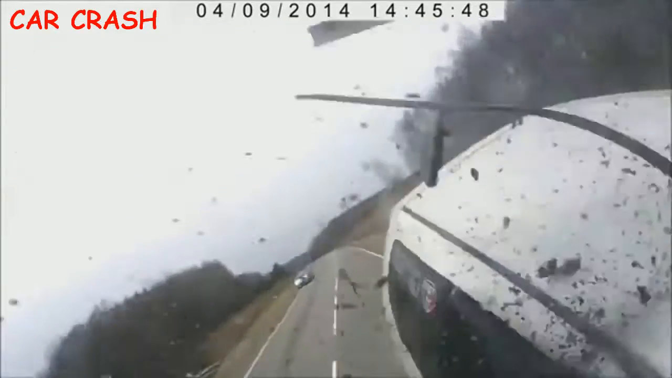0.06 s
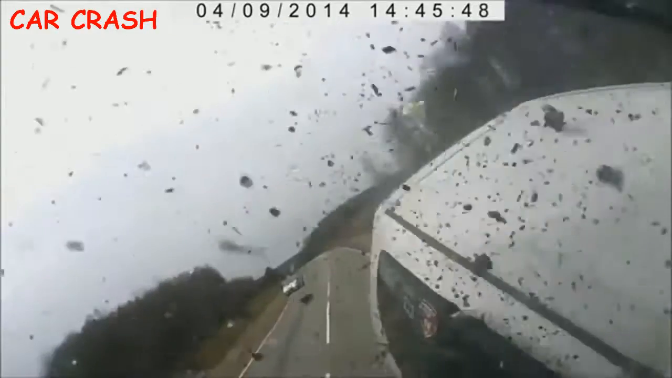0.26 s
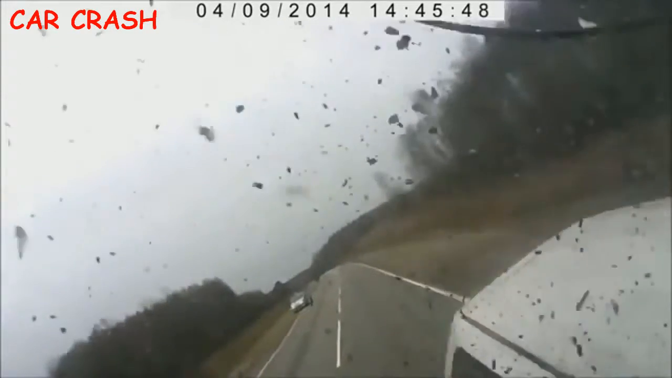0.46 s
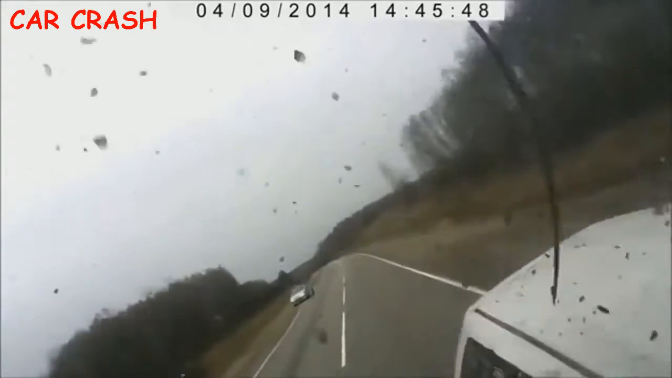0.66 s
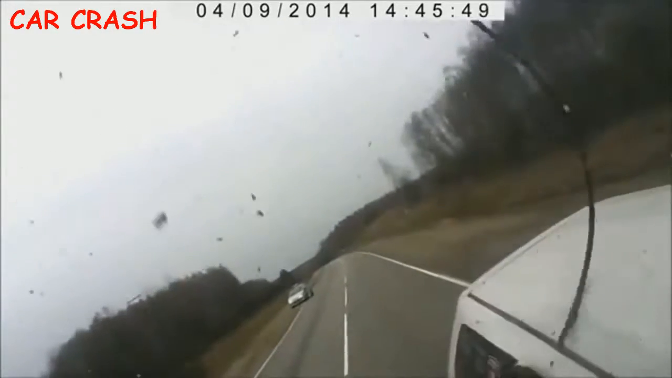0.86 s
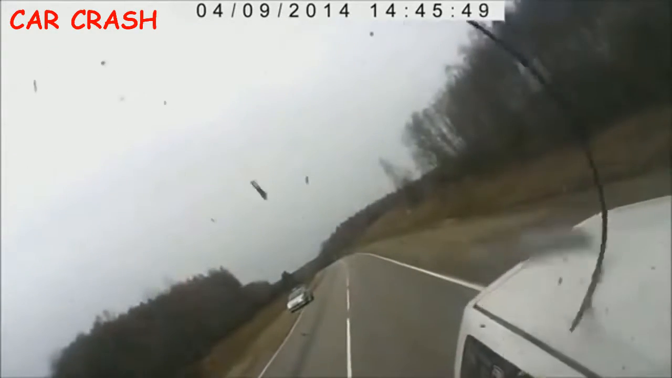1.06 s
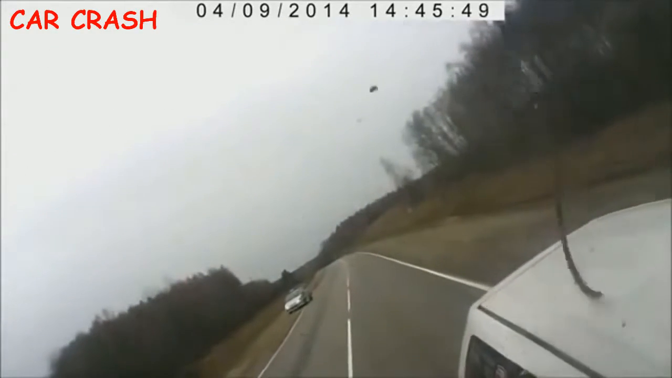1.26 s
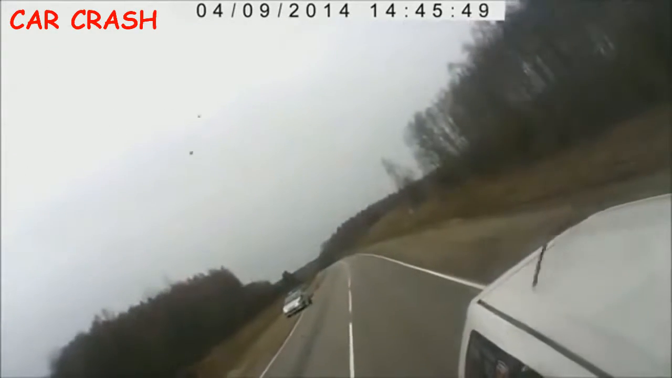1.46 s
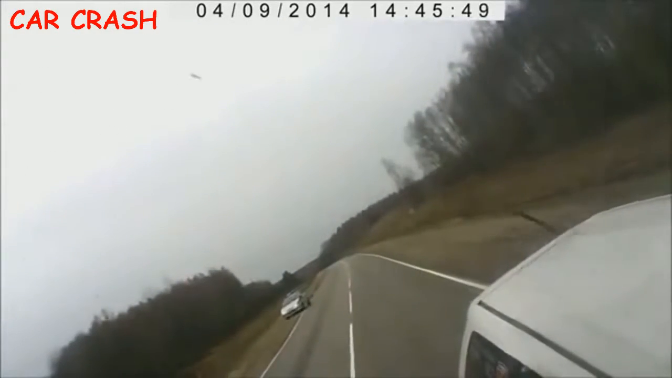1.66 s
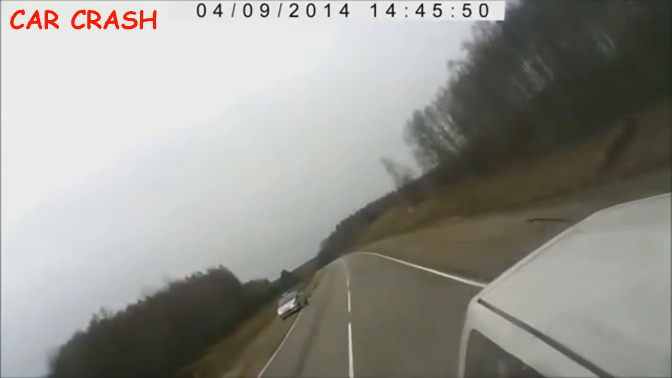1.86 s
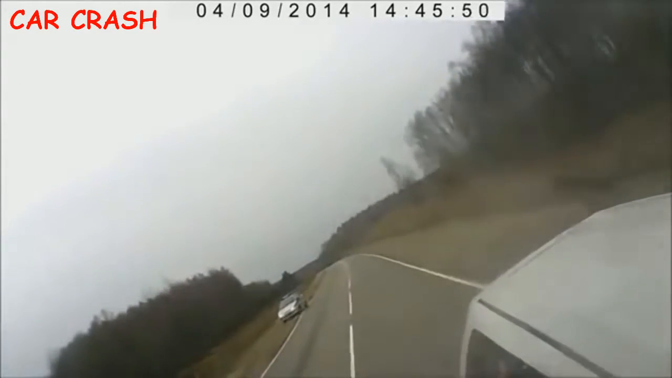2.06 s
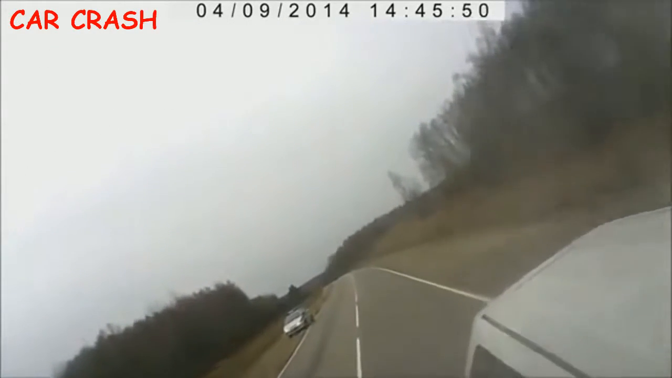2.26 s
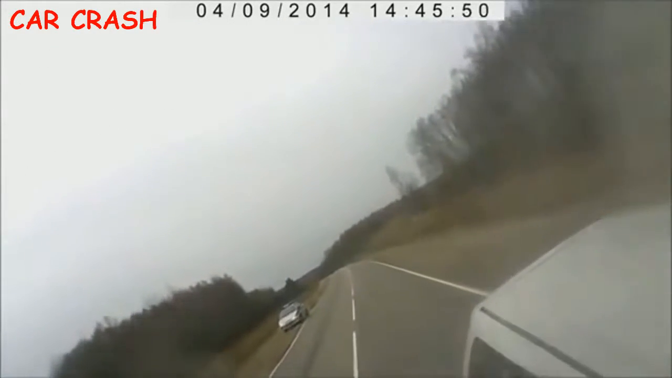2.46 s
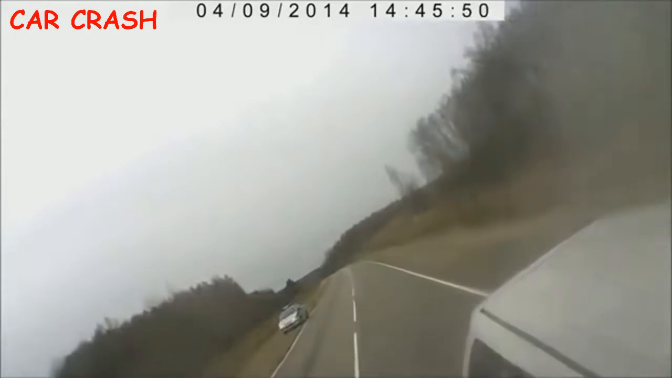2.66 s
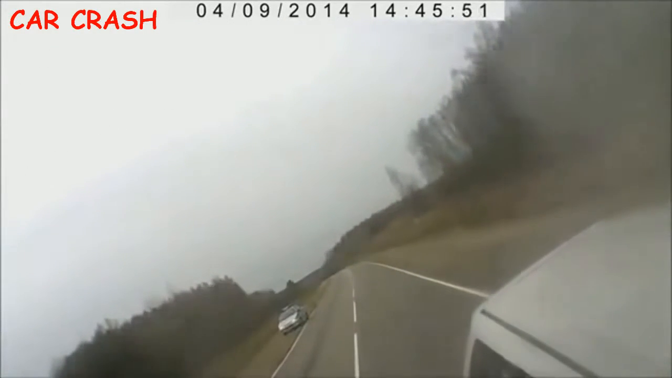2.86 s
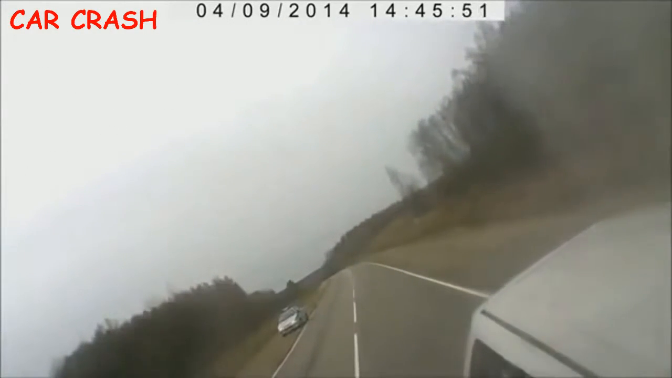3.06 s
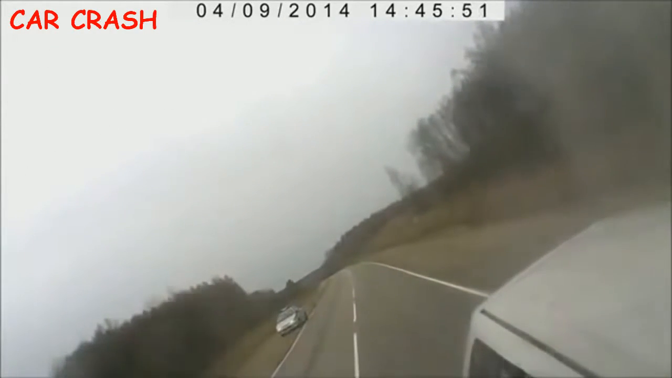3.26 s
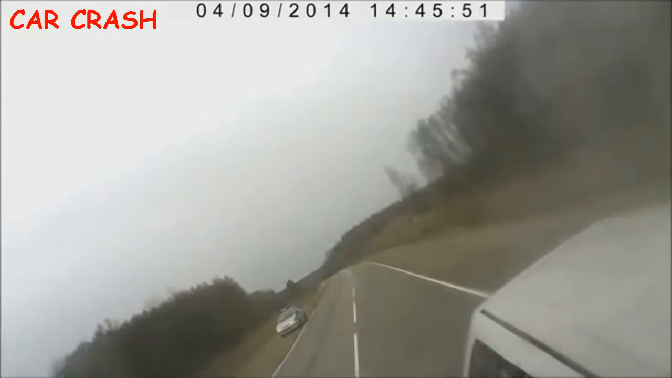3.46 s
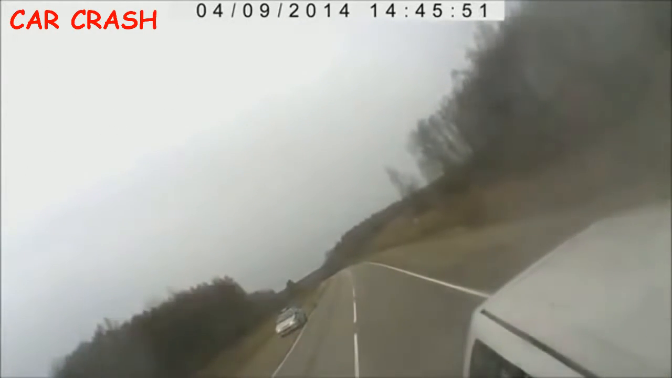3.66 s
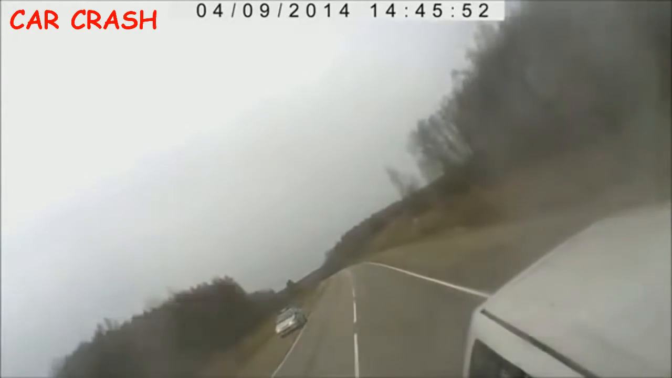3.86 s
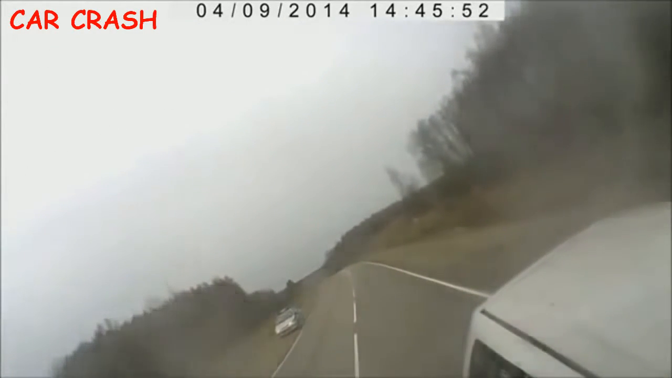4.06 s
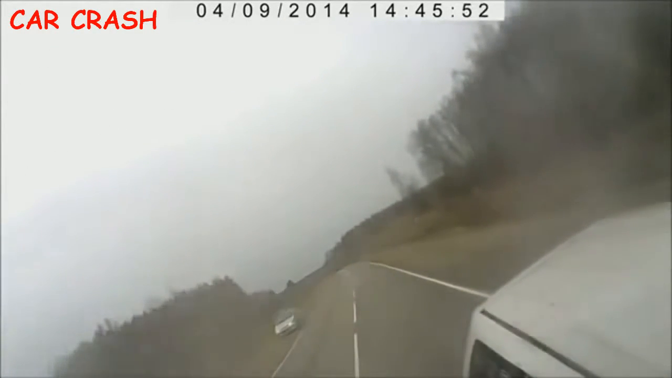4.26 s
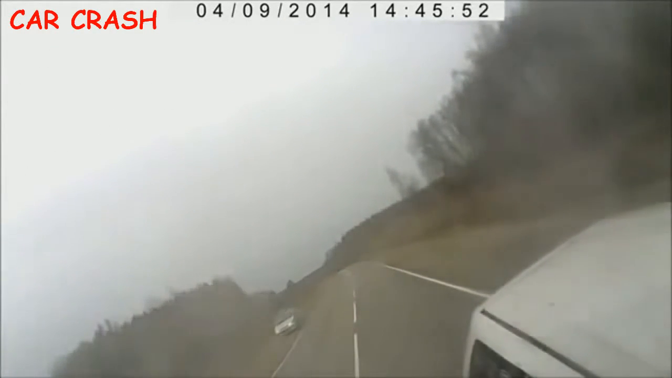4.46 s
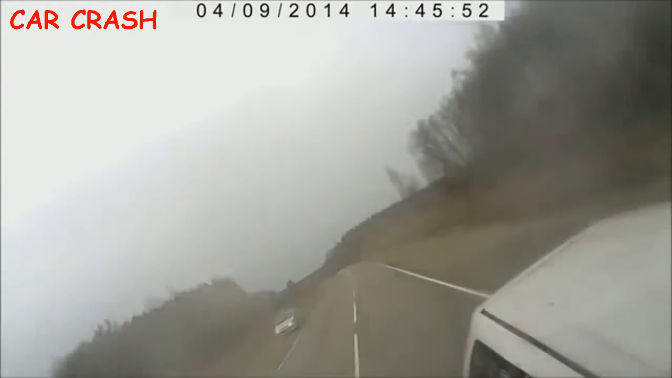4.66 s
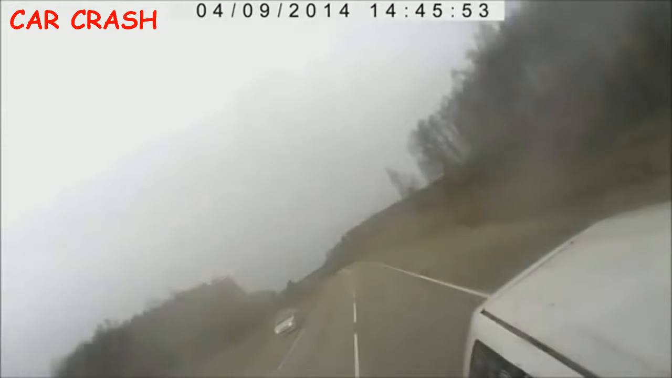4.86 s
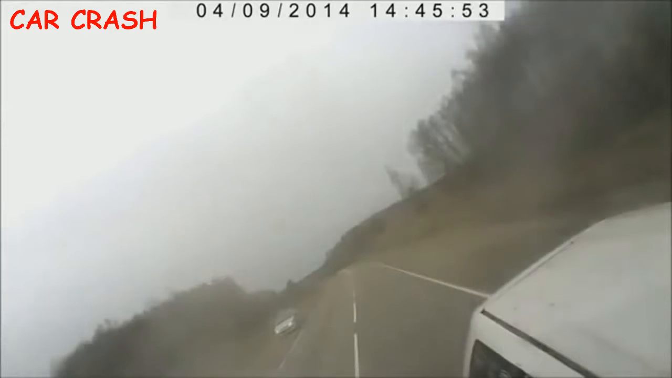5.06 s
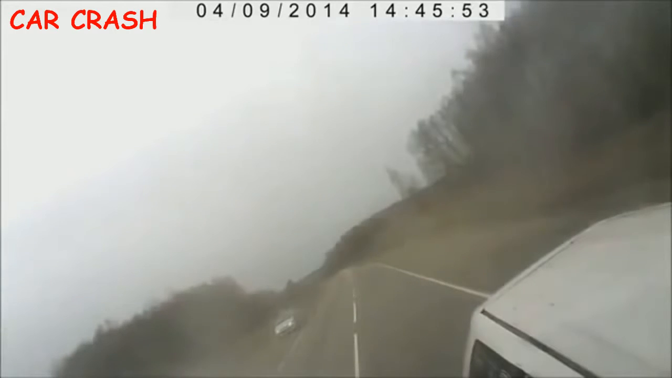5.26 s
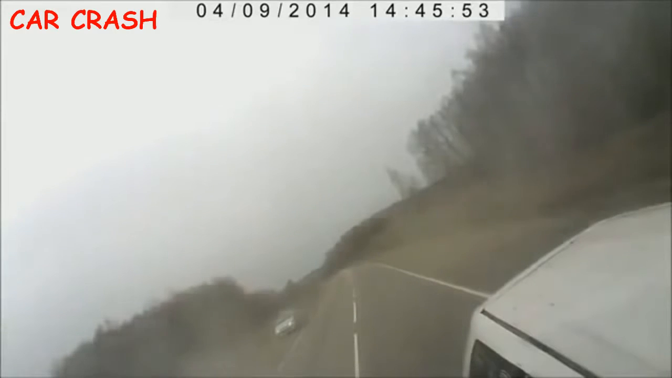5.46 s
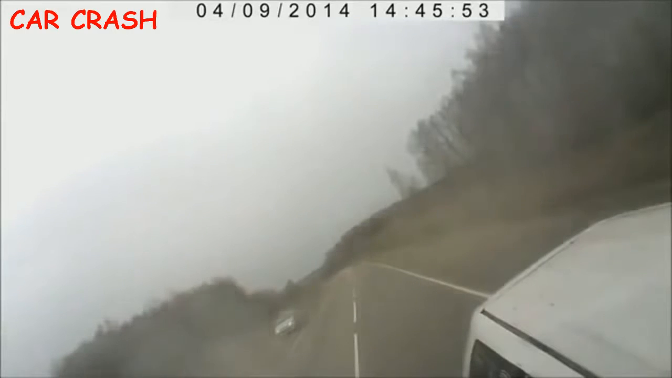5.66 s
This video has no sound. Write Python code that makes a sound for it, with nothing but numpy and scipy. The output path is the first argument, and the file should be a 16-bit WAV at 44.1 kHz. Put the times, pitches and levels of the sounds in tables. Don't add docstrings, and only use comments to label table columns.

```python
import sys
import numpy as np
from scipy import signal
from scipy.io import wavfile
from scipy.ndimage import uniform_filter1d

SR = 44100
rng = np.random.default_rng(int(sys.argv[2]) if len(sys.argv) > 2 else 0)


def makeup_ratio(level_db):
    decades = np.asarray(level_db, float) / 20
    return 10 ** decades


def int16_out(signal):
    q = np.round(np.clip(np.atleast_2d(signal).T, -1, 1) * 32767)
    wavfile.write(sys.argv[1], SR, q.astype(np.int16))


N = 252428


def level(x, db):
    return x * makeup_ratio(db) / np.sqrt(np.mean(x ** 2))


def noise():
    return rng.standard_normal(N)


def band(x, hz, width):
    return signal.lfilter(*signal.iirpeak(hz, hz / width, fs=SR), x)


def body(x, modes):
    total = sum((-1) ** k * makeup_ratio(db) * band(x, hz, width) for k, (hz, width, db) in enumerate(modes))
    return level(total, 0)


def dull(x, hz):
    return signal.sosfilt(signal.butter(2, hz, fs=SR, output="sos"), x)


def walk(rate):
    k = int(SR / rate)
    held = np.repeat(rng.standard_normal(N // k + 1), k)
    return 1.7 * uniform_filter1d(uniform_filter1d(held, k), k)[:N]


def add(out, s, sound):
    i = int(s * SR)
    out[i:i + len(sound)] += sound[:len(out) - i]


def shower(rate, spread_db, t60):
    hit = rng.random(N)
    size = np.minimum(rng.exponential(size=N), 2.5)
    kicks = (hit < rate / SR) * makeup_ratio(spread_db * size)
    return level(signal.lfilter([1], [1, -1000 ** (-1 / (t60 * SR))], kicks), 0)


def bursts(starts, peaks_db, rise_s, fall_db_s):
    time, power = np.arange(0, N, 32) / SR, 1e-12
    for s, db in zip(starts, peaks_db):
        rise = np.clip(1 + (time - s) / rise_s, 0, 1)
        power = power + makeup_ratio(2 * (db - fall_db_s * np.maximum(time - s, 0))) * rise ** 2
    return np.interp(np.arange(N) / SR, time, 10 * np.log10(power))


def effort():
    # start_s, crushing force level_db, glass share level_db
    stages = [(0.0, -11, -18), (0.3, -12.5, -20), (0.4, -12.5, -16.5), (0.52, -11.5, -15.5),
              (0.58, -11.5, -18), (0.71, -10.5, -10.5), (0.86, -11.5, -20.5), (0.95, -18.5, -15.5),
              (1.18, -23, -17.5), (1.47, -32, -18.5), (1.9, -37.5, -26), (2.12, -36.5, -32),
              (2.3, -28.5, -12.5), (2.47, -28, -14), (2.61, -25.5, -17), (2.7, -33, -40), (2.8, -31, -16),
              (3.02, -34.5, -15.5)]
    s, force_db, share_db = np.transpose(stages)
    time = np.arange(N) / SR
    wreck_left = np.clip(1 + (s[-1] - time) / 0.076, 0, 1)
    return np.interp(time, s, force_db), np.interp(time, s, share_db), wreck_left


def glass(force_db, share_db):
    # start_s, grit level_db, dust level_db re grit
    sprays = [(.145, -27.5, -14), (.19, -26, -6), (.235, -25, -9.5), (.26, -24, -10), (.288, -27, -9),
              (.335, -28.5, -14.5), (.38, -23, -11.5), (.405, -26, -10.5), (.455, -24, -9), (.52, -24, -12),
              (.585, -25, -10), (.62, -25, -9), (.79, -23.5, -8), (1.0, -34.5, -7.5), (1.122, -35.5, -8.5),
              (0.431, -24, -8.5), (0.498, -18.5, -15), (0.698, -22.5, -1), (0.751, -21, -1),
              (0.859, -18.5, -21), (0.951, -21.5, -16.5), (1.31, -35.5, -7.5), (1.7, -49, -2),
              (1.925, -46, -19), (1.96, -39.5, -19), (2.052, -67, 9), (2.122, -57.5, 7), (2.152, -54, 7),
              (2.299, -41, 6.5), (2.385, -40.5, -3.5), (2.652, -38.5, -12), (2.781, -42.5, -0.5),
              (2.944, -35, -23), (3.06, -51, -1), (1.465, -40.5, -14), (1.578, -48, -6.5),
              (2.59, -40.5, -11.5), (2.097, -45, -20)]
    s, grit_db, dust_db = np.transpose(sprays)
    settling_db = -2 * np.arange(N) / SR
    dust_share_db = -26 + share_db + 19.5 + settling_db
    levels = []
    for base_db, peak_db in ((share_db, grit_db), (dust_share_db, grit_db + dust_db)):
        spray_db = bursts(s, peak_db, rise_s=0.0016, fall_db_s=511) - force_db
        levels.append(10 * np.log10(makeup_ratio(2 * base_db) + makeup_ratio(2 * spray_db)))
    return levels


def pings(rate, t60):
    out, t = np.zeros(N), np.arange(int(.08 * SR)) / SR
    for when, pitch, size, life in rng.random((int(rate * 2.6), 4)):
        note = np.sin(2 * np.pi * 2000 * 4.7 ** pitch * t)
        add(out, 3.3 * when, makeup_ratio(12.0 * size) * note * 1000 ** (-t / (t60 * (.3 + life))))
    return level(out, -4.5)


def wreck(crunch_db, grit_db, dust_db):
    # pitch_hz, width_hz, level_db
    panel_modes = [(272.2, 150, -2), (545, 283, -1.5), (780, 223, -1.5), (1084, 286, -2), (1600, 1340, -11),
                   (2182, 370, -12)]
    # pitch_hz, width_hz, level_db
    grit_modes = [(2700, 620, -3), (3960, 670, 1), (5744, 1200, -11.5)]
    # pitch_hz, width_hz, level_db
    dust_modes = [(8600, 3700, 11), (7000, 840, 0.5), (10980, 15000, 6)]
    impacts = shower(300., spread_db=2.2, t60=.02)
    shards = shower(500., spread_db=-11.0, t60=0.024)
    bulk = np.clip(.55 - 0.1 * np.arange(N) / SR, .12, 1)
    panels = level(dull(body(noise() * (bulk + impacts), panel_modes), 1900), 0)
    grit = level(dull(body(noise() * (0.1 + impacts + .5 * shards), grit_modes), 8400), 0)
    grit = grit + makeup_ratio(-5.0) * dull(pings(190.0, t60=0.16), 5000)
    dust = body(noise() * (.25 + .8 * impacts + .7 * shards), dust_modes)
    return makeup_ratio(crunch_db) * (panels + makeup_ratio(grit_db) * grit + makeup_ratio(dust_db) * dust)


def lurches():
    # start_s, sway level_db, boom level_db
    jolts = [(0.0, 5.5, -8), (0.119, -14.5, -5), (.2, -9.5, -13.5), (0.318, -16, -17), (.41, -13, -22),
             (0.572, 2.5, -10), (.83, -8, -17.5), (.95, -20, -19), (1.11, -43, -22.5), (1.27, -19, -25),
             (1.41, -22, -25.5), (1.51, -26, -29.5), (1.62, -21, -28), (1.72, -24, -25.5), (1.8, -9, -31),
             (1.89, -19, -30.5), (2.0, -23, -29.5), (2.08, -30, -22.5), (2.17, -36, -26.5),
             (2.26, -33, -31), (2.39, -24, -30.5), (2.55, -36.5, -30.5), (2.8, -45, -38), (3.0, -29, -38.5),
             (3.33, -45, -43)]
    s, sway_db, boom_db = np.transpose(jolts)
    return bursts(s, sway_db, 0.06, 214), bursts(s, boom_db, 0.06, 104)


def frame(sway_db, boom_db):
    # pitch_hz, width_hz, level_db
    boom_modes = [(56, 55, -0.5), (80.4, 18.9, 5), (122, 35.7, 1), (202, 181, -7.5)]
    sway = level(band(band(noise(), 27, 14), 27, 14), 0)
    return makeup_ratio(sway_db - 7.5) * sway + makeup_ratio(boom_db + 0.78 * walk(12)) * body(noise(), boom_modes)


def engine():
    # start_s, level_db
    idle = [
        (2.8, -44),
        (3.54, -41.5),
        (3.67, -47.5),
        (3.85, -42),
        (4.25, -45),
        (4.64, -42),
        (4.96, -44.5),
        (5.26, -42.5),
        (5.7, -46.5),
    ]
    # multiple of the firing pitch, level_db
    orders = [(1, 2), (2, -12.5), (3, -19), (4, -18), (5, -21.5), (6, -25.5), (7, -35), (8, -26)]
    # pitch_hz, level_db per hertz
    spectrum = [(45, -8), (85, 2), (197, -5.5), (406, -1), (1000, -13), (2450, -35.5), (3900, -32.5),
                (12000, -59)]
    firing_hz = 27.6
    phase = 2 * np.pi * np.cumsum(firing_hz * (1 + 0.0099 * walk(7.1))) / SR
    tone = sum(makeup_ratio(db + min(k, 4) * walk(7.8)) * np.cos(k * (phase + 0.12)) for k, db in orders)
    tone = level(tone, 0) * makeup_ratio(np.interp(np.arange(N) / SR, *np.transpose(idle)) + 5.5)
    hz, db = np.transpose(spectrum)
    clatter = 0
    for centre in 50 * 2 ** np.arange(0, 8, 1 / 3):
        flicker_db = 0.75 * walk(9.8) + 1.4 * np.cos(phase)
        strip = band(band(noise(), centre, centre / 3), centre, centre / 3)
        clatter = clatter + makeup_ratio(np.interp(np.log(centre), np.log(hz), db) + flicker_db) * strip
    clatter = level(clatter * makeup_ratio(0.72 * walk(2.5)), -46)
    block = band(noise() * makeup_ratio(1.9 * np.cos(phase)), 1020, 43)
    valve_cover = noise() * makeup_ratio(1.5 * walk(6) + 1.5 * np.cos(phase))
    valve_cover = band(band(valve_cover, 1400, 600), 1400, 800)
    cab_floor = band(band(noise() * makeup_ratio(1.5 * walk(3)), 55, 35), 55, 40)
    return tone + level(valve_cover, -62.5) + level(cab_floor, -52) + clatter + level(block, -56.0)


def knocks(table, gain_db, ring_share, width, treble_db, slap_db, t60_s, freer_per_s):
    out, t = np.zeros(N), np.arange(int(.15 * SR)) / SR
    for s, db, hz, rel_db in table:
        rough = rng.standard_normal((3, len(t)))
        note_t60_s = max((t60_s + freer_per_s * s) * (700 / hz) ** .3, .005)
        fall = 1000 ** (-t / note_t60_s)
        note = ring_share * np.sin(2 * np.pi * hz * t)
        note = note + (1 - ring_share) * level(band(rough[0], hz, width * hz), -6)
        slap = dull(dull(band(rough[2] * fall ** 2, 1350, 1400), 2400), 2600)
        crack = dull(band(rough[1] * fall ** 2, 3300, 2700), 5200)
        crack = crack + .05 * np.diff(rough[1], prepend=0) * fall ** 4
        knock = note * fall * np.minimum(.3 + t * hz, 1)
        knock = knock + makeup_ratio(slap_db) * slap / abs(slap).max()
        knock = knock + makeup_ratio(rel_db + treble_db) * crack / abs(crack).max()
        add(out, s + 0.001491, makeup_ratio(db + gain_db) * knock)
    return out


def crush_blows():
    # start_s, peak level_db, pitch_hz, treble level_db re peak
    hits = [(0.014, 2, 810, 0.5), (0.027, 5, 401, -4), (0.067, 10.5, 1170, -3.5), (0.082, 10, 400, -2),
            (0.098, 4.5, 520, -16.5), (0.143, 0, 930, -9), (0.187, 9, 617, -22.5), (0.215, 2.5, 730, -10),
            (0.235, 13, 431, -17), (0.254, 1.5, 760, -1.5), (0.273, -14, 476, -11.5), (0.284, 2, 463, -6.5),
            (0.323, -2.5, 1080, -7.5), (0.344, -5, 726, -28.5), (0.404, 8, 780, -6), (0.436, 7, 1230, 3.5),
            (0.463, -6.5, 1160, -7), (0.498, -7, 557, -11.5), (0.517, 7.5, 990, -18),
            (0.585, 5.5, 451, -16.5), (0.699, 8, 620, -7), (0.751, 9.5, 746, -13), (0.787, 7, 994, -11.5),
            (0.837, 7, 412, -12), (0.868, -1.5, 530, 0), (0.94, 5, 886, -26), (1.005, -2, 645, -17),
            (1.054, -7.5, 637, -23.5), (1.122, -0.5, 422, -17), (1.224, -13, 520, -23.5)]
    return knocks(hits, gain_db=-9.5, ring_share=0.46, width=0.27, treble_db=-1.0, slap_db=-5.0,
                  t60_s=0.005, freer_per_s=0.092)


def heaves():
    # start_s, level_db, length_s, direction, stall_db of the crunch
    pushes = [(0.054, -9, 0.005, -1, 7), (0.077, -4.5, 0.0098, -1, 14.5), (0.1, -5, 0.0094, -1, 10),
              (0.118, 2.5, 0.017, -1, 10.5), (0.139, -4, 0.069, -1, 6), (0.297, -2.5, 0.014, 1, 24.5),
              (0.313, 24, 0.0063, -1, -15), (.375, -8.5, 0.0046, 1, 31), (0.438, -1.5, 0.0037, 1, 35),
              (0.477, -5, 0.0053, 1, 14), (0.56, -1.5, 0.018, 1, 10), (0.603, -7, 0.0011, 1, 25.5),
              (0.727, 1, 0.0034, 1, 12), (.811, -6.5, 0.005, 1, 22), (0.835, -11, 0.0012, -1, 28)]
    swell, stall = np.zeros(N), np.zeros(N)
    for s, db, length, way, stall_db in pushes:
        n = int(length * SR)
        add(swell, s, np.sign(way) * makeup_ratio(db) * np.hanning(n))
        add(stall, s, stall_db * signal.windows.tukey(n, .3))
    return swell, makeup_ratio(-stall)


def snaps():
    # start_s, peak level_db, pitch_hz
    splinters = [(0.0662, -5, 2170), (0.0974, -17, 1940), (0.186, -10, 1820), (0.3234, -11, 2660),
                 (0.9425, -11, 1830), (0.9744, -17, 1940), (0.9994, -17.5, 4160), (1.0194, -17, 4180),
                 (1.0494, -16.5, 1910), (1.099, -18, 1820), (1.1218, -18.5, 1960), (1.2234, -27, 1880),
                 (1.2655, -24, 3910), (1.296, -23.5, 2630), (1.3144, -28, 3730), (1.4656, -22.5, 1950),
                 (1.5209, -29, 3330), (1.5744, -36.5, 1970), (1.703, -30, 1990), (1.7345, -36, 1920),
                 (1.9175, -32, 2080), (1.96, -23, 2360), (2.0118, -32.5, 1940), (2.0517, -42, 2040),
                 (2.0757, -41, 1870), (2.098, -25.5, 2940), (2.163, -25.5, 1830), (2.1999, -28.5, 1850),
                 (2.2434, -33, 2150), (2.2997, -12.5, 3080), (2.3854, -20, 2160), (2.4424, -26.5, 1880),
                 (2.511, -17.5, 1790), (2.5214, -24, 1890), (2.556, -23, 1870), (2.585, -15, 1820),
                 (2.6484, -22.5, 1830), (2.6674, -29.5, 1800), (2.7247, -34, 1930), (2.7414, -34, 2010),
                 (2.7836, -22, 1930), (2.7906, -24.5, 1880), (2.822, -21, 1800), (2.826, -22, 1820),
                 (2.842, -22, 1860), (2.8649, -25, 1900), (2.8874, -32, 1910), (2.9148, -24.5, 3300),
                 (2.9497, -24.5, 3830), (2.9764, -38, 2370), (3.0194, -31.5, 2150), (3.3044, -34.5, 2290),
                 (3.327, -35, 1900), (3.338, -35, 2350), (3.352, -40, 1870), (3.3787, -45, 2510)]
    out, t = np.zeros(N), np.arange(int(.02 * SR)) / SR
    for s, db, hz in splinters:
        edge = np.diff(rng.standard_normal(len(t)), prepend=0) * 1000 ** (-t / .004)
        note = np.sin(2 * np.pi * hz * t) * 1000 ** (-t / 0.0096)
        add(out, s, makeup_ratio(db - 3.0) * (note + makeup_ratio(-14) * edge))
    return out


def cab(x):
    t = np.arange(int(.2 * SR)) / SR
    echo = dull(dull(rng.standard_normal(len(t)), 1500), 1800)
    echo = echo * 1000 ** (-t / 0.061) * np.minimum(t / 0.002, 1)
    return x + makeup_ratio(-15) * signal.fftconvolve(x, echo / np.linalg.norm(echo))[:N]


def rings():
    # start_s, pitch_hz, level_db, time aloft_s
    fragments = [(0.485, 3800, -19, 0.03), (0.51, 4400, -20, 0.025), (0.615, 4700, -25.5, 0.06),
                 (0.3, 4300, -27.5, .03), (.64, 8500, -33, .04), (1, 9000, -44, .08),
                 (1.04, 7100, -47, .06), (1.08, 8400, -48, .05), (.786, 8650, -31, 0.025),
                 (0.969, 4200, -33, 0.15), (.985, 6900, -39, 0.044), (0.998, 2400, -31, 0.081),
                 (.93, 3400, -31, 0.078), (.96, 5500, -36.5, .04), (0.88, 5250, -36, .03),
                 (1.07, 3250, -35, 0.069), (1.0, 2940, -38, 0.13), (1.1, 4700, -44, .07),
                 (1.2, 4200, -44, .06), (1.24, 3900, -41, 0.072), (1.25, 4200, -44, .04),
                 (1.05, 5180, -38, 0.07), (0.91, 4600, -40, 0.1), (1.418, 3000, -43.5, 0.044),
                 (1.426, 4530, -46.5, 0.047), (2.178, 3760, -47.5, 0.1), (2.184, 5300, -55, 0.1),
                 (2.305, 2175, -33.5, 0.066), (2.355, 2160, -29.5, 0.055), (2.4, 2165, -39, 0.05),
                 (2.327, 8640, -44, 0.05), (2.432, 3300, -37, .03), (2.35, 6200, -46, .03),
                 (2.96, 8300, -53, 0.028), (3.07, 11000, -63, .04), (5.3, 450, -40, 0.027),
                 (2.947, 3810, -20.5, 0.015),]
    out, tumble, wobble = np.zeros(N), makeup_ratio(3 * walk(60)), 1 + .006 * walk(45)
    for s, hz, db, length in fragments:
        t = np.arange(int(length * SR)) / SR
        phase = 2 * np.pi * hz * np.cumsum(wobble[int(s * SR):][:len(t)]) / SR
        pair = np.sin(phase) + makeup_ratio(-10.5) * np.sin(1.012 * phase)
        landing = np.minimum(1, np.minimum(t / .003, (length - t) / .02))
        add(out, s, makeup_ratio(db - 8.5 * t / length) * pair * landing)
    return out * tumble


def rattles():
    # start_s, level_db, pitch_hz, treble level_db re clump, length_s
    clumps = [(1.219, -27, 615, -18, 0.048), (1.40, -32, 700, -18, 0.053), (1.482, -30, 800, -25, 0.031),
              (1.59, -34, 1010, -23, 0.043), (1.64, -32, 1100, -22, .02), (2.01, -33.5, 800, -23, 0.027),
              (2.185, -34, 850, -25, .04), (2.325, -33, 780, -30, 0.018), (2.5, -28, 750, -22, 0.037),
              (2.35, -34, 780, -15, 0.029), (2.37, -28, 900, -10, 0.044), (2.432, -23, 703, -20, 0.025),
              (2.481, -28, 706, -37, 0.022), (2.551, -28, 865, -40, 0.044), (2.57, -27.5, 1110, -42, 0.051),
              (2.655, -35.5, 870, -52.5, 0.018), (2.718, -33, 1120, -30, 0.021),
              (2.742, -39, 750, -25, .025), (2.782, -28, 1033, -37, 0.018), (2.817, -28.5, 960, -36, 0.022),
              (2.83, -27.5, 780, -13, 0.032), (2.927, -35.5, 940, -17, 0.021),
              (3.315, -38, 1160, -17, 0.052), (3.044, -61, 1240, -9, 0.29), (3.434, -46.5, 890, -17, 0.037)]
    out, grains = np.zeros(N), shower(700.0, spread_db=-8.0, t60=0.017)
    for s, db, hz, rel_db, length in clumps:
        i, n = int(s * SR), int(length * SR)
        push = np.pad(rng.standard_normal(n) * grains[i:i + n] * np.hanning(n), (0, 900))
        panel = level(dull(band(push, hz, 0.3 * hz), 1840), 0)
        upper = level(dull(band(push, 1.36 * hz, hz), 2700), -6.5)
        grit = level(dull(band(push, 3000, 2100), 5500), rel_db + 2.0)
        add(out, s, makeup_ratio(db - 3.0) * (panel + upper + grit))
    return out


def debris_knocks():
    # start_s, peak level_db, pitch_hz, treble level_db re peak
    hits = [(1.268, -12, 990, -23.5), (1.31, -20, 570, -1), (1.439, -12, 302, -25),
            (1.641, -12, 514, -38.5), (1.866, -25, 355, -35), (1.895, -33, 302, -13), (1.917, -22, 318, -7),
            (1.355, -8, 396, -41), (2.015, -16.5, 312, -16), (2.027, -22, 493, -6.5),
            (2.096, -12.5, 1020, -10.5), (2.123, -15.5, 337, -19), (2.261, -20.5, 300, -18),
            (2.297, -14.5, 820, 1.5), (2.509, -20, 342, -20), (2.522, -10, 1170, -5),
            (2.557, -15, 670, -19.5), (2.585, -8, 1080, -7.5), (2.728, -16.5, 1210, -23),
            (2.742, -16, 686, -13), (2.78, -7, 1207, -34.5), (2.82, -14, 470, -18),
            (2.843, -18, 582.7, -14), (2.914, -8, 1007, -14.5), (2.943, -24.5, 456, 3),
            (2.976, -18.5, 640, -32), (2.86, -15.5, 241, -29.5), (3.336, -18, 646, -23),
            (3.429, -12, 360, -40), (3.4295, -24, 560, -30), (3.452, -29, 480, -15),
            (3.336, -24, 1400, -25), (3.345, -22, 458, -30)]
    return knocks(hits, gain_db=-7.0, ring_share=0.87, width=0.51, treble_db=2.5, slap_db=-13.0,
                  t60_s=0.034, freer_per_s=0.0045)


def bounces():
    # start_s, peak level_db
    landings = [(1.4648, -6), (1.5347, -10.5), (1.549, -14), (1.570, -10), (1.589, -14), (1.7033, -10),
                (1.8076, -10), (1.8455, -10.5), (1.9597, -8.5), (2.0116, -19), (2.1628, -5.5), (2.1997, -9),
                (2.9766, -18)]
    # pitch_hz, level_db, t60_s
    modes = [(800, 0, .021), (850, -13, .06), (1150, -6, .016), (560, -9, .02), (1650, -10, .012),
             (2400, -18, .01)]
    out, t = np.zeros(N), np.arange(int(.08 * SR)) / SR
    contact = np.minimum(t / .0007, 1)
    for (s, db), detune in zip(landings, rng.standard_normal((len(landings), len(modes)))):
        ring = 0
        for (hz, mode_db, t60), d in zip(modes, detune):
            note = np.sin(2 * np.pi * hz * (1 + .04 * d) * t)
            ring = ring + makeup_ratio(mode_db + 2 * d) * note * 1000 ** (-t / t60)
        add(out, s + .0003, makeup_ratio(db - 2.0) * ring * contact)
    return out


def fitting():
    # pitch_hz, level_db, t60_s
    modes = [(1950, -51, 0.27), (2660, -59, 0.59), (4530, -50, 0.278), (5750, -60, .07), (6340, -59, 0.092)]
    out, t = np.zeros(N), np.arange(int(.3 * SR)) / SR
    ring = sum(makeup_ratio(db) * np.sin(2 * np.pi * hz * t) * 1000 ** (-t / t60) for hz, db, t60 in modes)
    add(out, 3.066, ring * np.minimum(t / .003, 1))
    return out * makeup_ratio(2.06 * walk(60))


def ticks():
    # start_s, peak level_db, pitch_hz
    clicks = [
        (3.6071, -52, 2510),
        (4.53, -50, 3000),
        (4.748, -53, 2530),
        (4.8397, -62, 3810),
        (5.1236, -46, 4200),
        (5.1541, -54, 2920),
        (5.2818, -52, 3820),
        (5.401, -53, 3400),
    ]
    out, t = np.zeros(N), np.arange(int(.03 * SR)) / SR
    for s, db, hz in clicks:
        click = rng.standard_normal(len(t)) * 1000 ** (-t / 0.017)
        add(out, s, makeup_ratio(db + 8.0) * band(band(click, hz, 600), hz, 900))
    return out


def scene():
    time = np.arange(N) / SR
    crush = np.clip((.88 - time) / 0.42, 0, 1)
    slam = np.clip((.34 - time) / 0.066, 0, 1)
    force_db, share_db, wreck_left = effort()
    swell, stall = heaves()
    crunch = makeup_ratio(-4.0 * slam) * wreck(force_db, *glass(force_db, share_db)) * wreck_left
    crumple = makeup_ratio(4.88 * crush) * stall * (crunch + crush_blows())
    shudder = makeup_ratio(1.5 * crush + 1.3 * slam) * frame(*lurches()) + swell
    debris = cab(debris_knocks() + rattles() + ticks() + snaps())
    return (crumple + shudder + debris + bounces() + rings() + fitting() + engine())[None]


def top_cut(x):
    return signal.sosfilt(signal.butter(12, 15800, fs=SR, output="sos"), x)


def record(dry):
    ceiling = .76
    coupling_hz, capsule_hz = 8.1, 8300
    flat = dry / (1 + np.abs(dry / ceiling) ** 4) ** (1 / 4)
    passband = signal.butter(1, [coupling_hz, capsule_hz], "band", fs=SR, output="sos")
    flat = signal.sosfilt(passband, flat)
    flat = flat / (1 + np.abs(flat / .88) ** 8) ** (1 / 8)
    mix = flat + level(noise(), -73)
    return top_cut(mix)


dry = scene()
out = record(dry)
int16_out(out)
```